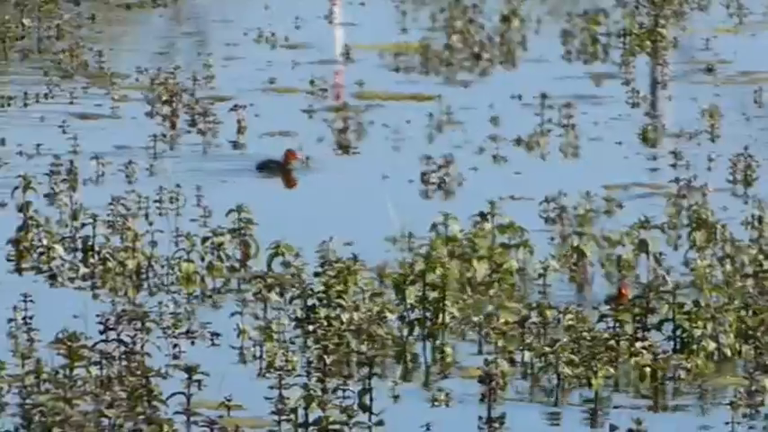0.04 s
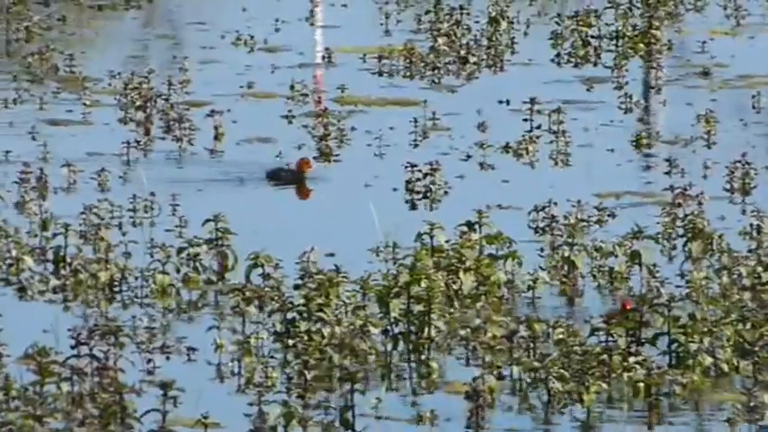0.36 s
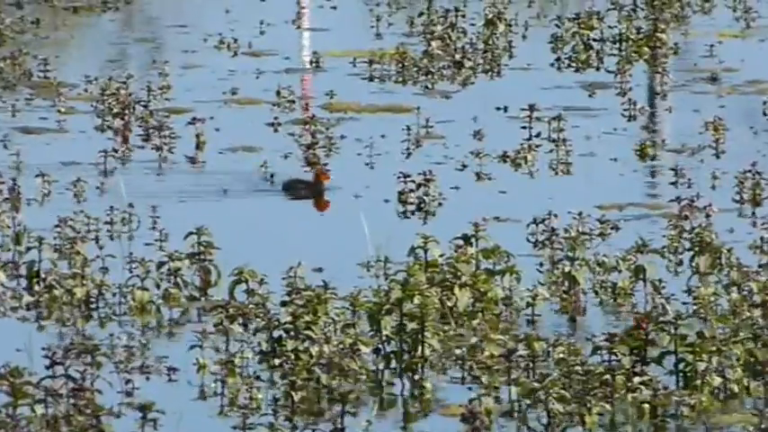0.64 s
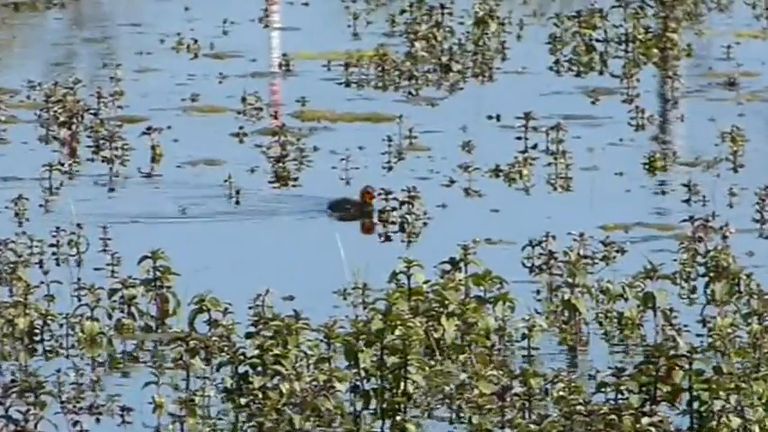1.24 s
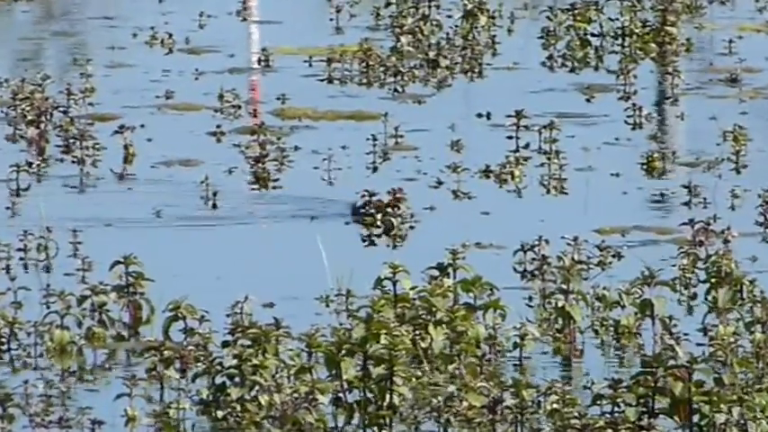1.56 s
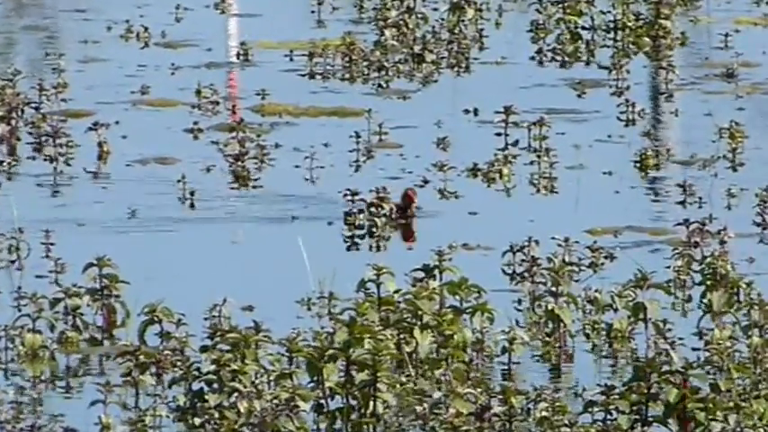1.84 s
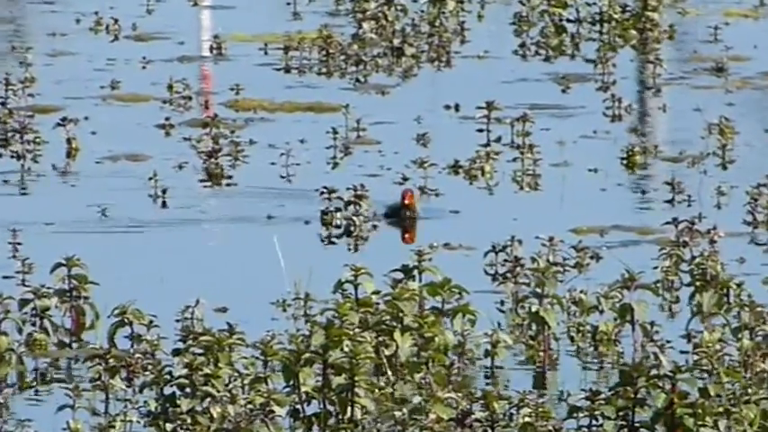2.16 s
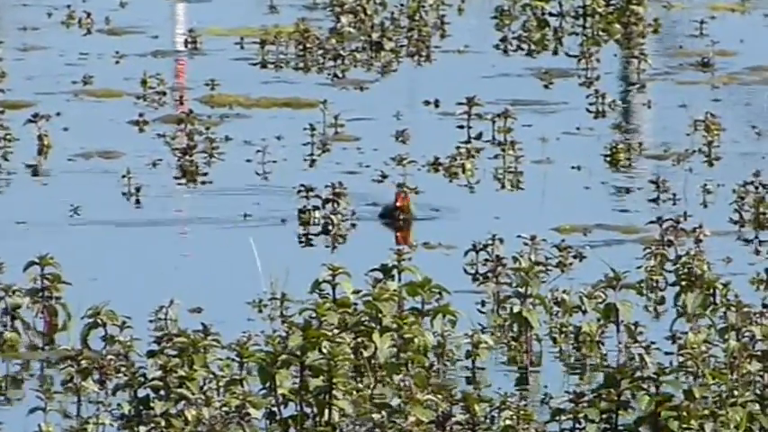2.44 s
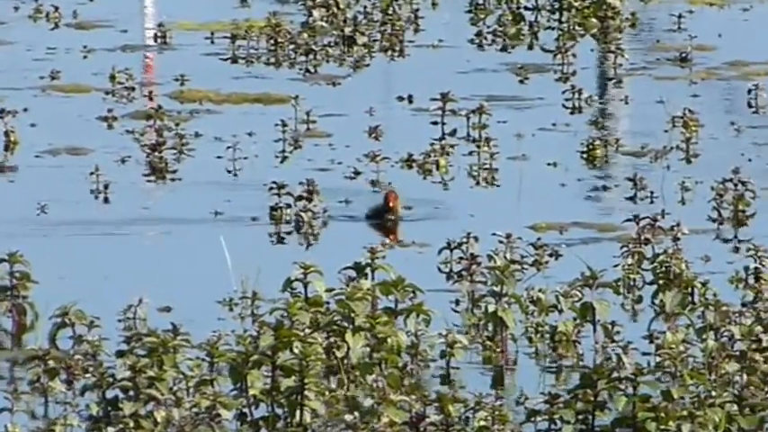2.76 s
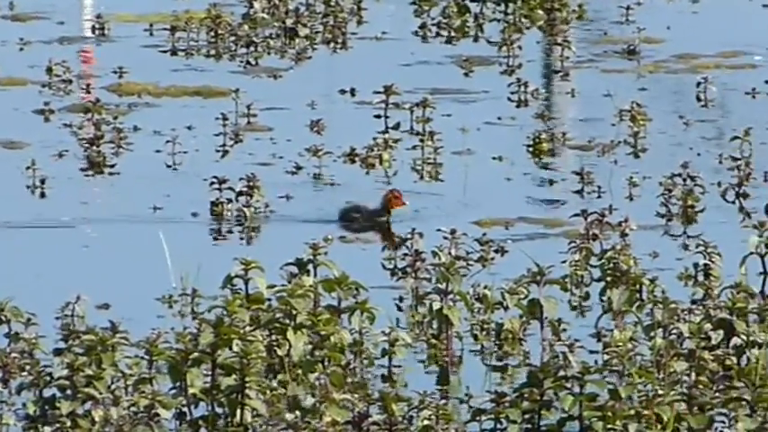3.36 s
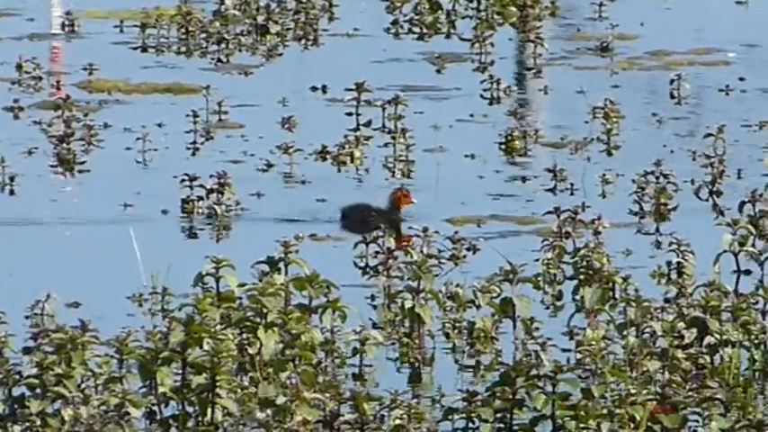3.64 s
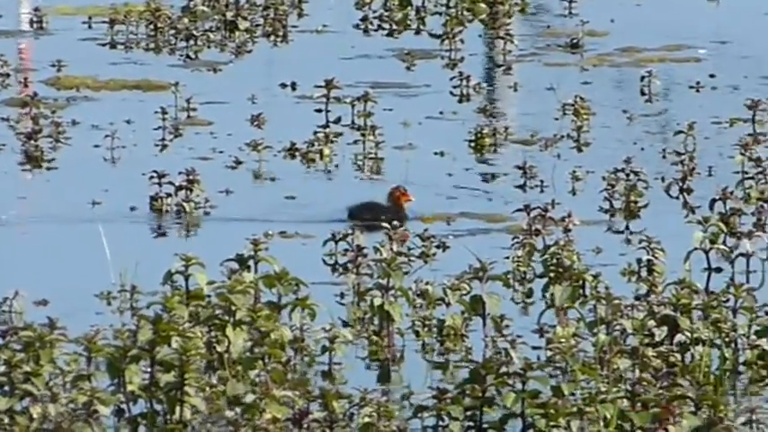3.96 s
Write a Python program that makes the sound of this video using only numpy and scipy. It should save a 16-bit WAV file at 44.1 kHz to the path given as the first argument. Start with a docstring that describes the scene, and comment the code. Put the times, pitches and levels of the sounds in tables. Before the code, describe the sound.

Wind gusts buffet the microphone by a pond while small birds chirp faintly.

```python
"""Wind gusts buffet a microphone on the bank of a weedy pond, driving its channels mostly in opposition.
Behind them lie a steady far rumble and the faint rustle of plants brushing together. Small birds
whistle, chirp and twitter at a distance, a larger one croaks far off in rough throat pulses, and
reeds and trees scatter the calls. A few dry ticks sound close by. Strong buffets duck the gain."""
import sys
import numpy as np
from scipy import signal
from scipy.fft import rfft, irfft
from scipy.io import wavfile

SR = 44100
rng = np.random.default_rng(int(sys.argv[2]) if len(sys.argv) > 2 else 0)


def materialize(psi):
    """Save the field psi as 16-bit PCM at rate SR to the path in sys.argv[1].

    A 1-D psi becomes a single channel; in a 2-D psi each row is a channel.
    """
    bounded = np.clip(np.atleast_2d(psi).T, -1, 1)
    quanta = np.round(bounded * 32767).astype(np.int16)
    wavfile.write(sys.argv[1], SR, quanta)


N = 176400
TIME_S = np.arange(N) / SR
BINS_HZ = np.fft.rfftfreq(N, 1 / SR)


def from_db(db):
    """Decibels to gain."""
    return 10 ** (np.asarray(db) / 20)


def unit_rms(x):
    """Scale to RMS 1."""
    return x / np.sqrt(np.mean(x ** 2) + 1e-20)


def colour(x, spectrum, column=1):
    """Filter by a dB spectrum, interpolated over log frequency."""
    spectrum = np.array(spectrum)
    gain_db = np.interp(np.log(BINS_HZ + 1e-9), np.log(spectrum[:, 0]), spectrum[:, column])
    return irfft(rfft(x) * from_db(gain_db), N)


def white():
    """White noise, 0 dB per Hz."""
    return rng.standard_normal(N) * np.sqrt(SR / 2)


def drift(corner_hz):
    """Low-passed noise, RMS 1."""
    return unit_rms(irfft(rfft(white()) / (1 + (BINS_HZ / corner_hz) ** 2), N))


def stereo(mid, side):
    """Mid/side to left/right."""
    return np.array([mid + side, mid - side])


def panned(x, pan_db):
    """Set left pan_db above right."""
    return x * from_db([[pan_db / 2], [-pan_db / 2]])


def swell(start_s, length_s):
    """Rounded envelope of one call."""
    progress = np.clip((TIME_S - start_s) / length_s, 0, 1)
    return np.sqrt(4 * progress * (1 - progress))


def bursts(rows, decay_s, attack_s=0.00066):
    """Envelope of sudden blows: linear rise, exponential decay."""
    envelope = 0
    for start_s, db in rows:
        age_s = np.maximum(TIME_S - start_s, 0)
        envelope += from_db(db) * np.minimum(age_s / attack_s, 1) * np.exp(-np.minimum(age_s / decay_s, 20))
    return envelope


# Wind strength: t/s, level/dB
GUSTS = [(0.0, -29), (0.06, -27.5), (0.15, -31.5), (0.17, -45), (0.23, -35.5), (0.27, -51), (0.37, -39.5),
         (0.41, -45.0), (0.51, -34), (0.61, -38), (0.67, -34), (0.69, -37), (0.71, -33.5), (0.89, -45),
         (0.97, -38.5), (0.99, -48.0), (1.21, -36.5), (1.3, -30.5), (1.36, -40), (1.38, -34), (1.44, -36.5),
         (1.51, -27.5), (1.54, -35.0), (1.64, -34.5), (1.69, -26), (1.76, -52), (1.78, -45), (1.8, -49.0),
         (1.84, -37.5), (1.87, -57), (1.92, -29.5), (1.95, -39.5), (1.97, -27), (1.99, -43), (2.01, -32),
         (2.08, -36), (2.11, -29), (2.21, -34), (2.34, -29), (2.37, -32.5), (2.46, -24.5), (2.49, -32),
         (2.55, -29), (2.7, -24.5), (2.73, -27), (2.75, -20), (2.77, -26.5), (2.81, -19.5), (2.84, -20.5),
         (2.88, -21.5), (2.9, -20), (3.14, -23), (3.17, -20), (3.26, -30.5), (3.33, -21.0), (3.49, -26.5),
         (3.52, -29.5), (3.58, -29.5), (3.6, -28), (3.62, -31), (3.66, -25), (3.68, -29.5), (3.71, -28.5),
         (3.74, -31), (3.85, -28.5), (3.94, -33), (3.97, -27.5), (4.0, -35)]
# Turbulence spectrum: f/Hz, side/(dB per Hz), mid/(dB per Hz)
WIND_SPECTRUM = [(30,-73,-101),(45,-91,-76),(67,-61,-82.5),(89.6,-58,-68),(148.5,-48,-64),(200,-47,-65),(295,-48.5,-71),(436,-52,-75),(752,-65,-81),(987,-75,-88),(1350,-85,-90.5),(2000,-101,-103),(2800,-115,-117),(6100,-135,-135)]
# Sudden eddies: t/s, level/dB
THUMPS = [(.028,-29.5),(.055,-25.5),(.073,-27.5),(1.523,-32.5),(1.686,-29),(2.233,-36),(2.455,-30),(2.741,-18.5),(2.871,-35),(2.921,-15),(3.296,-23.5),(3.317,-24),(3.35,-24),(3.38,-24.5),(3.542,-26.5),(3.87,-30)]
# Thump spectrum: f/Hz, level/dB
THUMP_SPECTRUM = [(60,-30),(130,13.5),(220,0),(450,1.5),(900,-7),(1600,-16.5),(2600,-58),(6000,-85)]


def wind(ref_db=-22.5, centre_hz=224, swing_per_octave=0.09, low_cut_hz=68.5):
    """Turbulence on the microphone ports: gusts swing high bands most, sudden eddies thump."""
    gust_db = np.interp(TIME_S, *np.transpose(GUSTS)) - ref_db
    eddy_db = 0.66 * drift(21) + 1.5 * drift(80)
    spectra = rfft(stereo(colour(white(), WIND_SPECTRUM, 2), colour(white(), WIND_SPECTRUM, 1)))
    bin_octave = np.clip(np.log2(BINS_HZ / centre_hz + 1e-9), -2, 4)
    out = 0
    for octave in range(-2, 5):
        band = irfft(spectra * np.maximum(1 - abs(bin_octave - octave), 0), N)
        swing_db = (gust_db + eddy_db) * (1 + swing_per_octave * octave)
        flicker_db = 2.03 * drift(21)
        out += band * from_db(swing_db + flicker_db - 3)
    thumps = unit_rms(colour(white(), THUMP_SPECTRUM)) * bursts(THUMPS, decay_s=0.0033)
    out += stereo(from_db(-12) * thumps, thumps)
    low_cut = signal.butter(5, low_cut_hz, "high", fs=SR, output="sos")
    return panned(signal.sosfilt(low_cut, out), pan_db=-0.61)


# Background spectrum: f/Hz, mid/(dB per Hz), side/(dB per Hz)
AIR_SPECTRUM = [(30,-99,-102),(49,-101,-104),(77.3,-83.5,-94),(168,-87.5,-99),(330,-93.5,-107),(850,-93,-99),(950,-95.5,-101),(1366,-101,-105),(2040,-107.5,-111),(3110,-112,-115),(4600,-109.5,-113.5),(6300,-110.5,-114),(8140,-112.5,-114),(10500,-119,-120.5),(13200,-125,-126),(14600,-131,-132)]


def air():
    """Steady far rumble and fine hiss."""
    return stereo(colour(white(), AIR_SPECTRUM, 1), colour(white(), AIR_SPECTRUM, 2))


# Breeze in the plants: t/s, level/dB
RUSTLE_LEVELS = [(0,-9),(.6,-2.5),(1.1,-2.5),(1.35,0.5),(1.58,-2),(1.75,-11),(2.3,-3),(2.72,-0.5),(2.85,0),(3.4,-4.5),(3.95,0.5)]
# Leaf spectrum: f/Hz, level/(dB per Hz)
RUSTLE_SPECTRUM = [(1500,-125),(3000,-116),(5000,-112),(8500,-112),(11000,-119),(15000,-127)]


def rustle(grains_per_s=2500, spread_db=3):
    """Leaves and stems brush together in dense tiny grains."""
    impulses = (rng.random((2, N)) < grains_per_s / SR) * rng.choice([-1, 1], (2, N))
    grains = impulses * from_db(spread_db * np.minimum(rng.exponential(1, (2, N)), 5))
    breeze = from_db(np.interp(TIME_S, *np.transpose(RUSTLE_LEVELS)))
    return colour(unit_rms(grains) * np.sqrt(SR), RUSTLE_SPECTRUM) * breeze


def scatter(x, wet_db, t60_s=0.5):
    """Add the diffuse echo of reeds and trees around the water."""
    mid, side = rng.standard_normal((2, SR)) * from_db(-60 * TIME_S[:SR] / t60_s)
    tail = stereo(mid, from_db(-4) * side)
    tail /= np.sqrt(np.sum(tail ** 2, axis=1, keepdims=True))
    return x + from_db(wet_db) * signal.fftconvolve(x, tail, axes=1)[:, :N]


def bird_notes(rows, waver_depth, waver_hz, tremor_db=2):
    """Each note is one unsteady tone gliding through three pitches."""
    out = np.zeros((2, N))
    waver = 1 + waver_depth * drift(waver_hz)
    tremor = from_db(tremor_db * drift(60))
    for start_s, length_s, *pitches_hz, db, pan_db in rows:
        on = (TIME_S > start_s) & (TIME_S < start_s + length_s)
        progress = (TIME_S[on] - start_s) / length_s
        glide_hz = np.polyval(np.polyfit([0, .5, 1], pitches_hz, 2), progress)
        tone = np.sin(2 * np.pi * np.cumsum(glide_hz * waver[on]) / SR)
        envelope = from_db(db) * np.sin(np.pi * progress) ** 0.44 * tremor[on]
        out[:, on] += panned(envelope * tone, pan_db)
    return out


# Buzzy falling calls: t/s, length/s, start f/Hz, middle f/Hz, end f/Hz, level/dB, pan L-R/dB
BUZZ_NOTES = [(-.06,0.17,4900,4580,4240,-67.5,-5),(0.0,0.28,4350,4060,3820,-72,-5),(2.07,.04,6360,6140,5500,-72.5,-6),(3.945,0.085,5120,4560,4170,-67,5)]
# Thin whistles: t/s, length/s, start f/Hz, middle f/Hz, end f/Hz, level/dB, pan L-R/dB
WHISTLE_NOTES = [(.05,.19,4260,4080,3870,-76,-6),(.36,0.16,3390,3270,3130,-78,-9),
                 (.95,.068,4900,4770,5240,-67.5,-2),(.995,.04,3750,3850,4160,-77,0),(1.02,0.15,5200,5500,5370,-71.5,-2),(1.035,0.1,3450,3710,3570,-74.5,-3),
                 (1.195,0.083,5970,6380,7020,-69,-3),(1.295,0.11,6990,7200,6580,-71.5,5),(1.245,.06,4750,5000,5200,-75,2),(1.285,.1,3380,3600,3300,-75.5,-3),(1.362,0.05,5080,4880,4800,-70,-1),
                 (2.157,.048,4920,4750,4720,-57,-5),(2.2,.052,4660,4720,4820,-62.5,-3),
                 (2.345,0.069,5700,5770,5900,-71,-7),(3.315,.045,6300,6380,6360,-73,0)]
# Quick rising chips: t/s, level/dB
RISING_CHIPS = [(0.691,-70),(.785,-73),(2.503,-66.5),(2.587,-68.5),(2.675,-68.5),(2.762,-71),(2.849,-67.5),(2.942,-70.5)]
CHIP_S, CHIP_HZ, CHIP_PAN_DB = .034, (3800, 4420, 5300), -3.5
# Falling chirps, each with a short high lead note: t/s, level/dB
FALLING_CHIRPS = [(1.848,-71.5),(2.405,-76),(3.106,-67),(3.26,-66.5),(3.42,-68),(3.58,-68),(3.74,-68)]
CHIRP_S, CHIRP_HZ, CHIRP_PAN_DB = .05, (5600, 4700, 3600), -3
LEAD_S, LEAD_HZ, LEAD_DB = .03, (5650, 5750, 5500), -3.5


def songbirds():
    """Small birds whistle; farther off, buzzes, chips and chirps arrive more scattered."""
    rows = [(t, CHIP_S, *CHIP_HZ, db, CHIP_PAN_DB) for t, db in RISING_CHIPS]
    for t, db in FALLING_CHIRPS:
        rows.append((t - 0.75 * LEAD_S, LEAD_S, *LEAD_HZ, db + LEAD_DB, CHIRP_PAN_DB))
        rows.append((t, CHIRP_S, *CHIRP_HZ, db, CHIRP_PAN_DB))
    song = bird_notes(rows, waver_depth=.022, waver_hz=200)
    buzzes = bird_notes(BUZZ_NOTES, waver_depth=.095, waver_hz=1400)
    far = scatter(song + buzzes, wet_db=-2, t60_s=.075)
    whistles = bird_notes(WHISTLE_NOTES, waver_depth=.006, waver_hz=160)
    return scatter(whistles, wet_db=-9) + from_db(-0.6) * scatter(far, wet_db=-3)


# Far twittering: t/s, length/s, f/Hz, width/Hz, level/dB
TWITTER_BANDS = [(.1,1.4,4740,235,-74),(0.156,1.6,7250,540,-80.5),(0.497,.34,5390,990,-74),(1.87,.14,5550,700,-75),(2.36,.1,5560,600,-76),(3.3,0.32,5450,450,-80)]


def twitter(flicker_db=2.5, flicker_hz=25):
    """Far birds merge into narrow flickering noise bands."""
    out = 0
    for start_s, length_s, hz, width_hz, db in TWITTER_BANDS:
        carrier = np.sin(2 * np.pi * hz * TIME_S)
        mid, side = (drift(width_hz / 2) * carrier for _ in range(2))
        envelope = swell(start_s, length_s) * from_db(db + flicker_db * drift(flicker_hz))
        out += stereo(mid, 0.52 * side) * envelope
    return out


# Far hoarse calls: t/s, length/s, f/Hz, level/dB
CROAK_CALLS = [(0.163,0.24,334,-68),(0.303,0.33,326.4,-64.5),(1.084,.48,316,-71)]
# Throat resonances: f/Hz, level/dB
THROAT_SPECTRUM = [(400,-31),(850,-6),(980,1.5),(1350,1),(1700,-9),(1950,-9.5),(2200,-17.5),(2600,-21),(3500,-37)]


def croaks(pitch_arch=.13, jitter=.072):
    """A larger bird's uneven throat pulses; their rate rises and falls with each call."""
    out = 0
    for start_s, length_s, hz, db in CROAK_CALLS:
        effort = swell(start_s, length_s)
        pitch_hz = hz * (1 + pitch_arch * (effort ** 2 - .5))
        cycles = [np.cumsum(pitch_hz * (1 + jitter * drift(300))) / SR for _ in range(2)]
        pulses = np.diff(np.floor(cycles), prepend=0)
        mid, side = (unit_rms(colour(train - train.mean(), THROAT_SPECTRUM)) for train in pulses)
        out += stereo(mid, from_db(-7) * side) * effort * from_db(db)
    return scatter(out, wet_db=-3)


# Close ticks: t/s, level/dB
DRY_TICKS = [(1.3815,-47.5),(2.727,-57),(2.9215,-48),(3.468,-60)]
# Tick spectrum: f/Hz, level/dB
TICK_SPECTRUM = [(200,-19),(850,18),(1300,5.5),(1950,10),(2900,-4),(4100,6.5),(5000,1),(7600,4),(11000,-7),(15000,-28)]


def ticks():
    """Short dry cracks near the microphone."""
    mid, side = (unit_rms(colour(white(), TICK_SPECTRUM)) for _ in range(2))
    return stereo(mid, from_db(-7) * side) * bursts(DRY_TICKS, decay_s=0.0028)


def scene():
    """Wind and ticks in front; air, plants and birds behind."""
    return wind() + air() + rustle() + songbirds() + twitter() + croaks() + ticks()


LIMIT_DB, ATTACK_S, RECOVER_DB_PER_S, CUTOFF_HZ = -14, 0.0055, 5, 15400


def record(dry):
    """Peak limiter with slow recovery, then a steep low-pass."""
    peak_db = 20 * np.log10(abs(dry).max(axis=0) + 1e-9)
    over_db = np.maximum(peak_db - LIMIT_DB, 0)
    recovery_db = RECOVER_DB_PER_S * TIME_S
    held_db = np.maximum.accumulate(over_db + recovery_db) - recovery_db
    pole = np.exp(-1 / (ATTACK_S * SR))
    gain = from_db(-signal.lfilter([1 - pole], [1, -pole], held_db))
    low_pass = signal.ellip(10, .1, 70, CUTOFF_HZ, fs=SR, output="sos")
    return signal.sosfilt(low_pass, dry * gain)


dry = scene()
out = record(dry)
materialize(out)
```